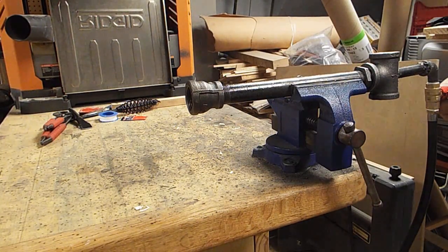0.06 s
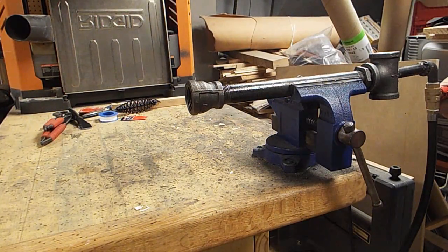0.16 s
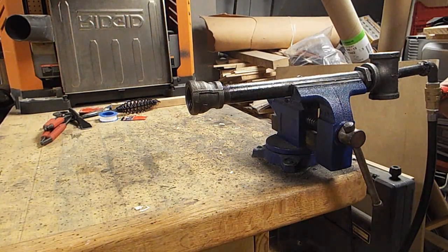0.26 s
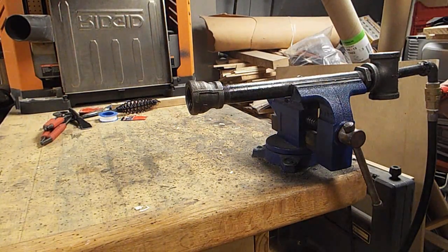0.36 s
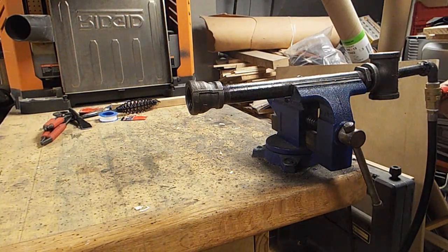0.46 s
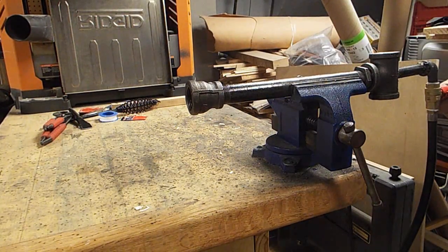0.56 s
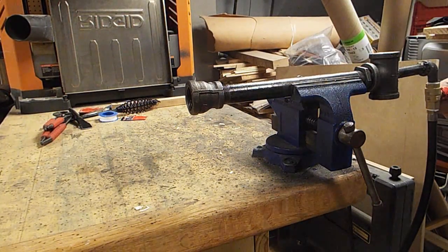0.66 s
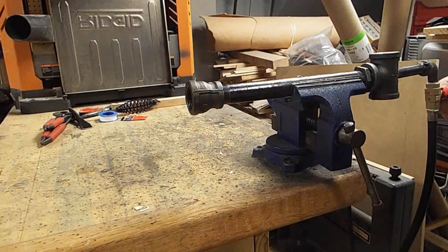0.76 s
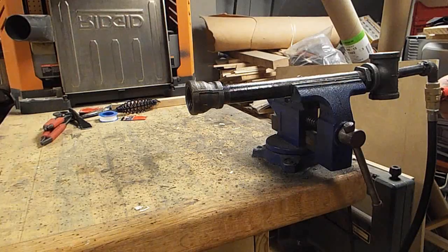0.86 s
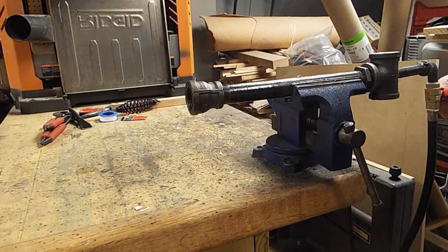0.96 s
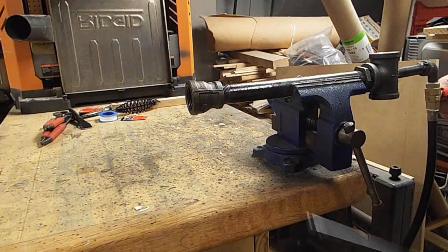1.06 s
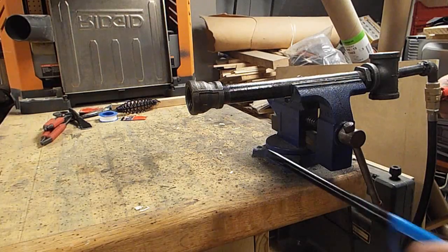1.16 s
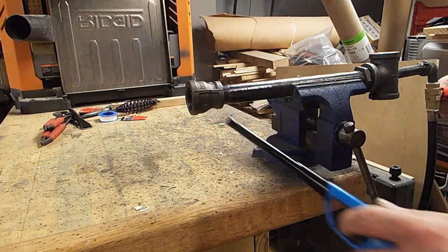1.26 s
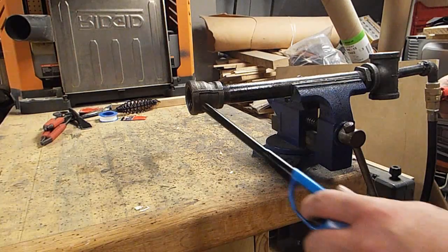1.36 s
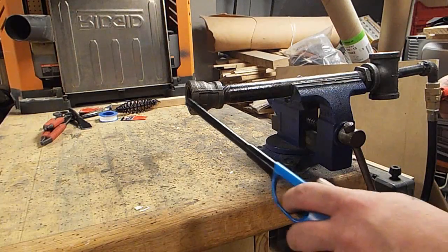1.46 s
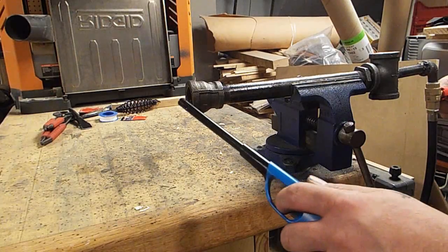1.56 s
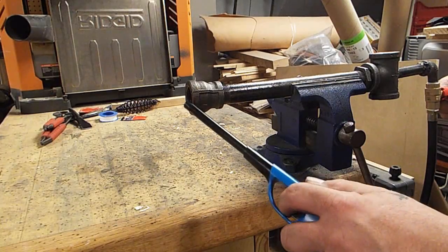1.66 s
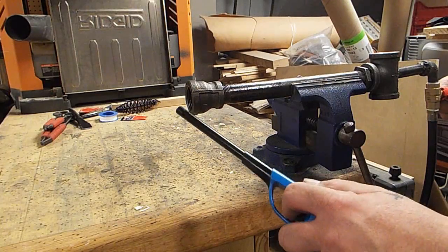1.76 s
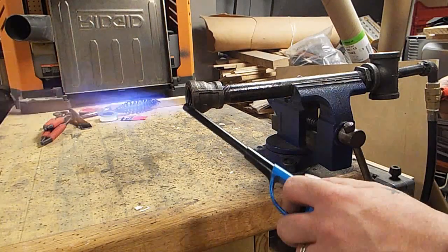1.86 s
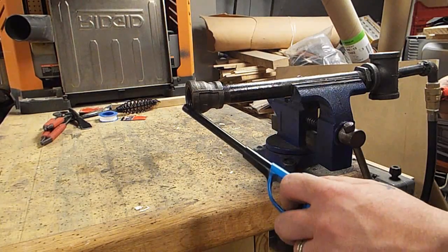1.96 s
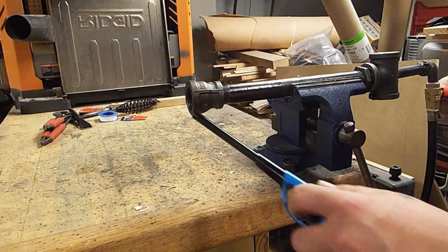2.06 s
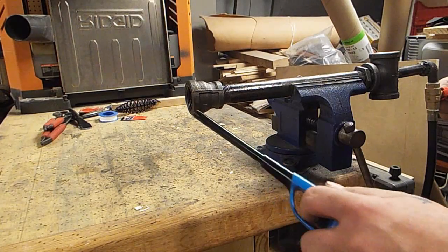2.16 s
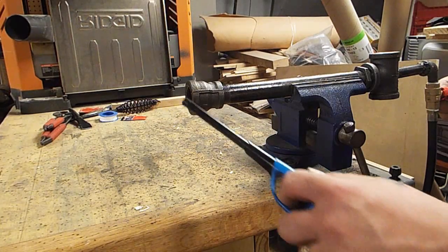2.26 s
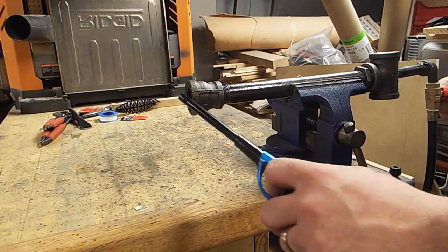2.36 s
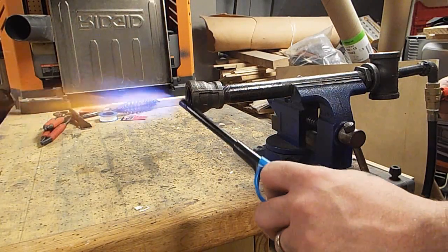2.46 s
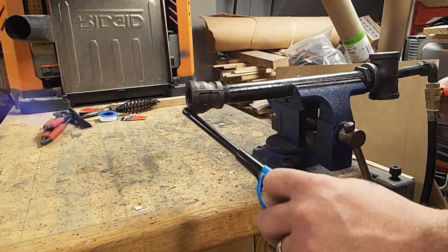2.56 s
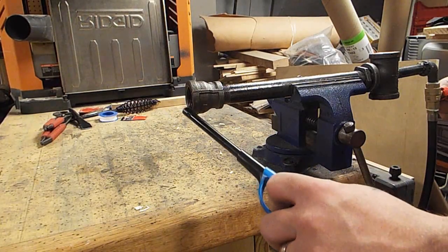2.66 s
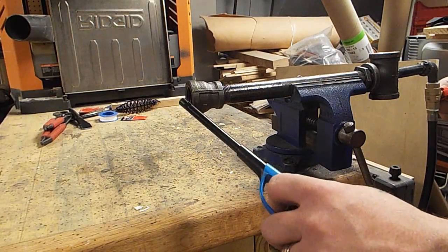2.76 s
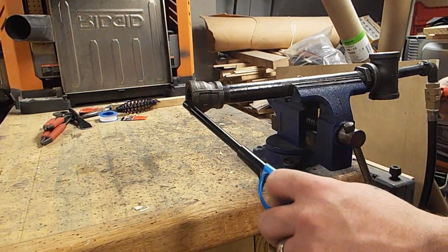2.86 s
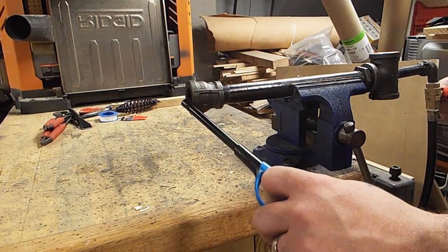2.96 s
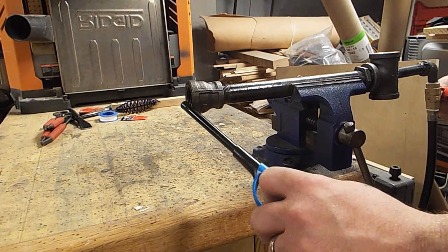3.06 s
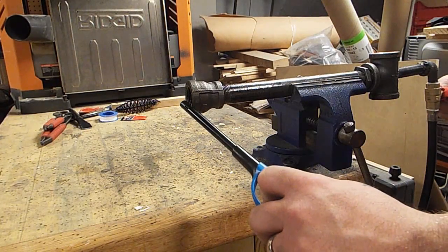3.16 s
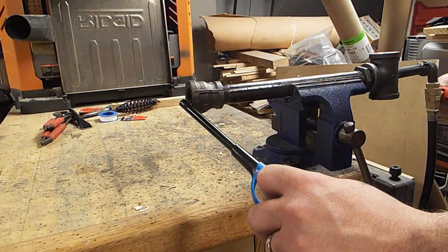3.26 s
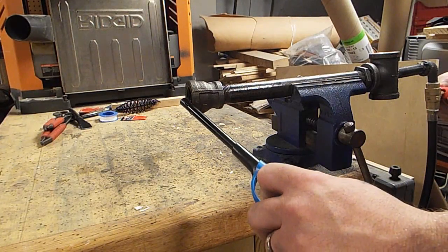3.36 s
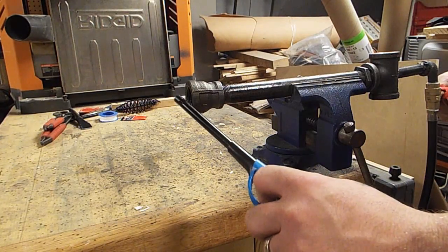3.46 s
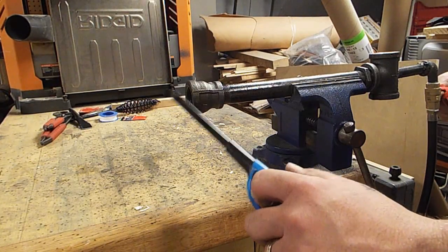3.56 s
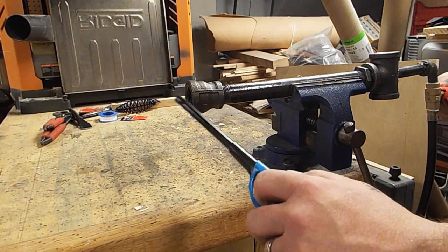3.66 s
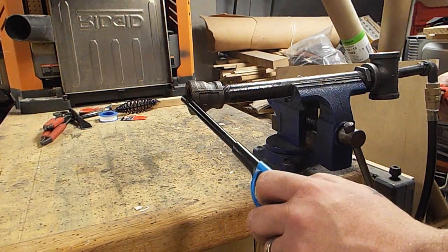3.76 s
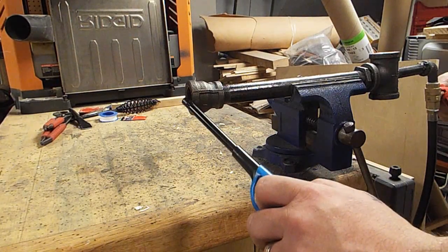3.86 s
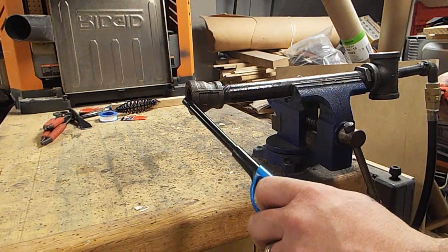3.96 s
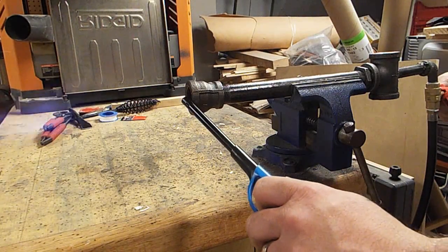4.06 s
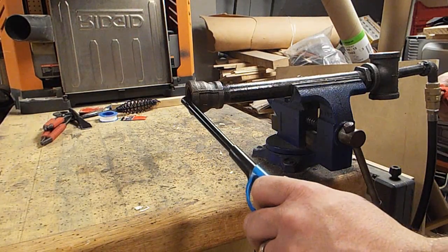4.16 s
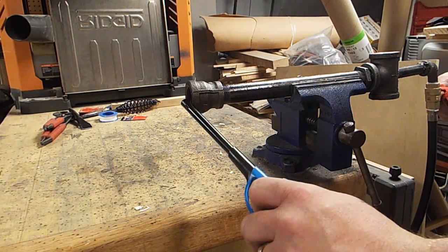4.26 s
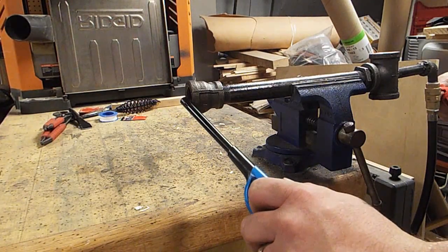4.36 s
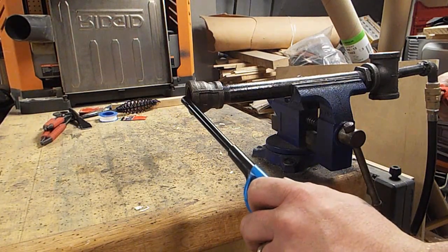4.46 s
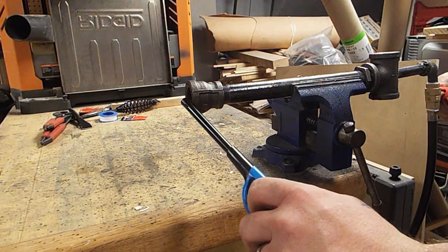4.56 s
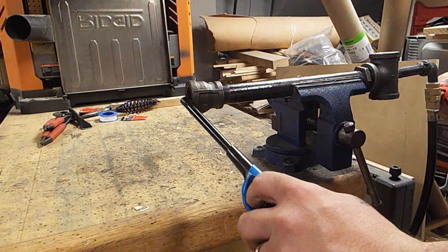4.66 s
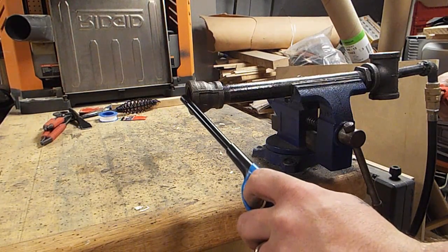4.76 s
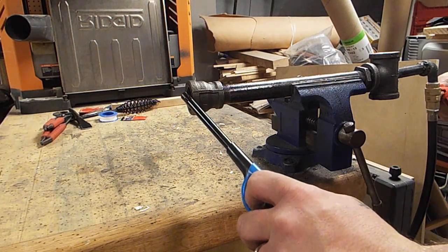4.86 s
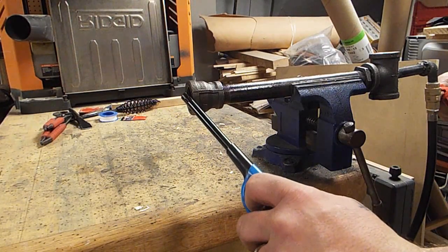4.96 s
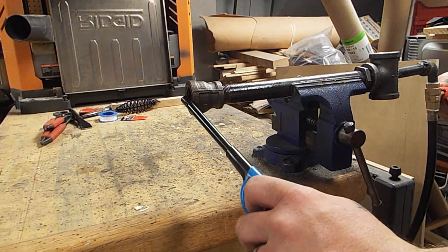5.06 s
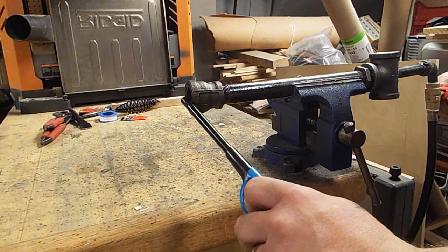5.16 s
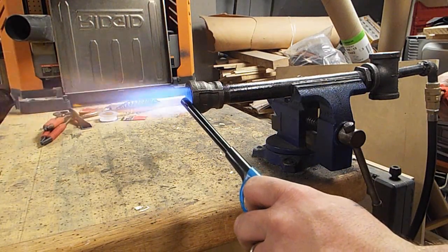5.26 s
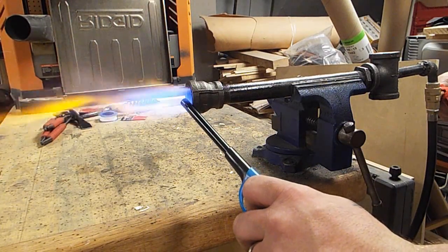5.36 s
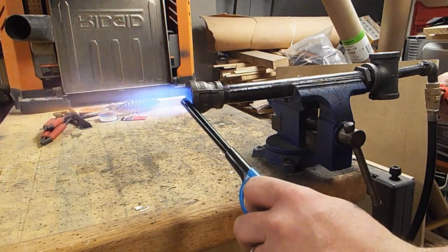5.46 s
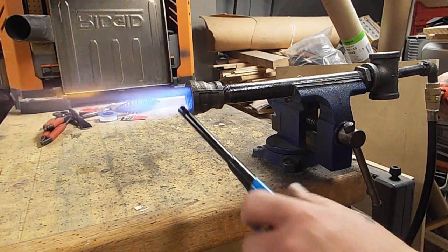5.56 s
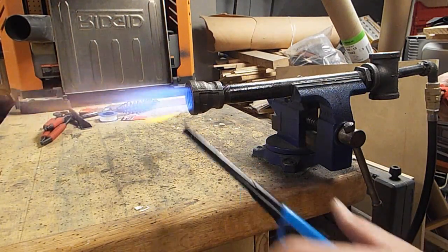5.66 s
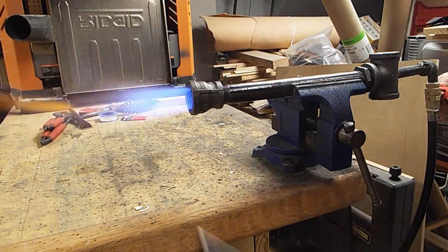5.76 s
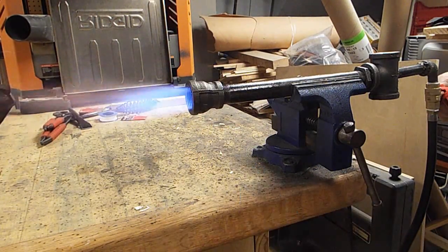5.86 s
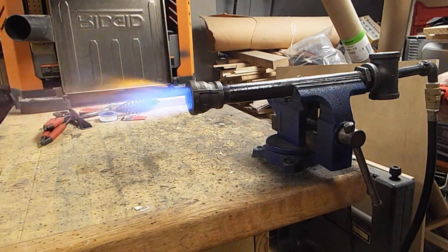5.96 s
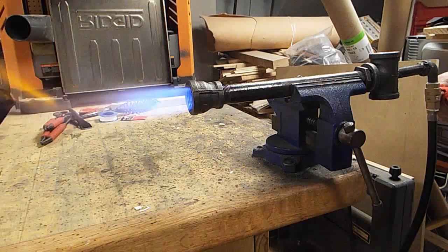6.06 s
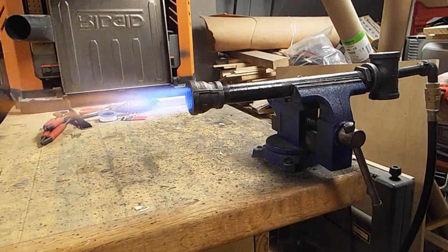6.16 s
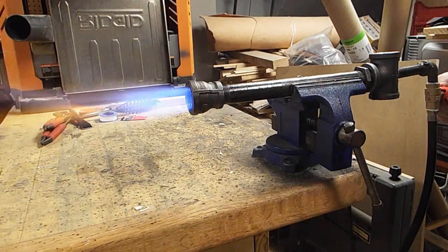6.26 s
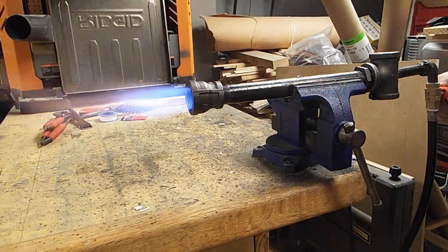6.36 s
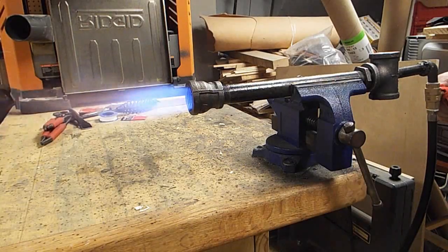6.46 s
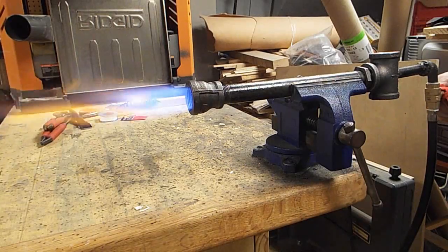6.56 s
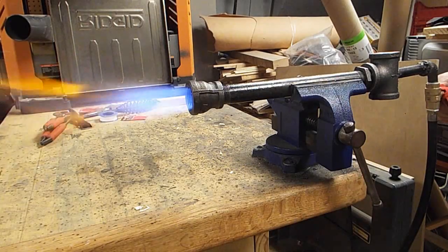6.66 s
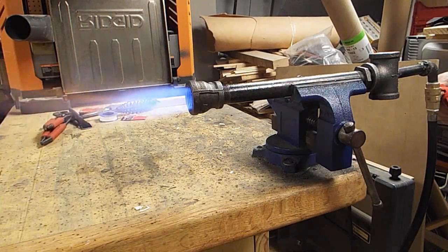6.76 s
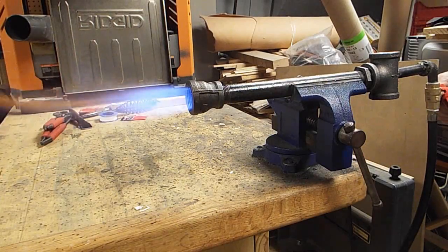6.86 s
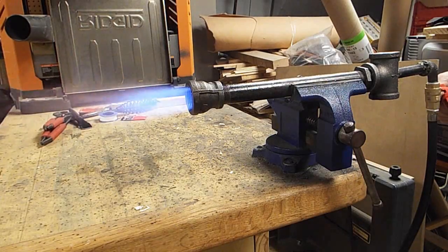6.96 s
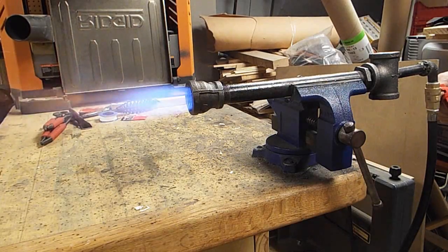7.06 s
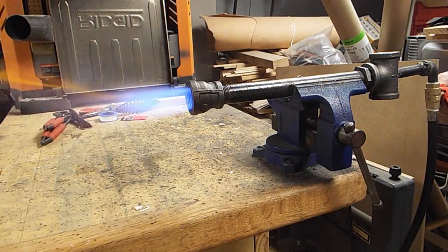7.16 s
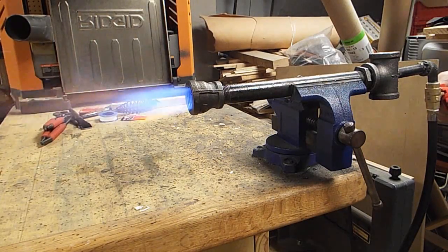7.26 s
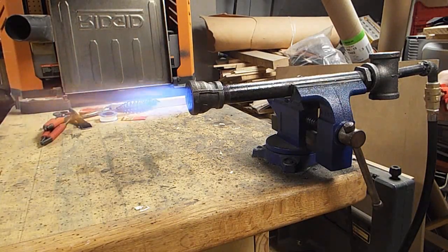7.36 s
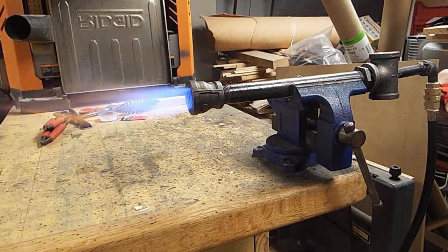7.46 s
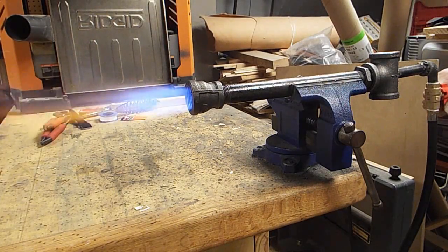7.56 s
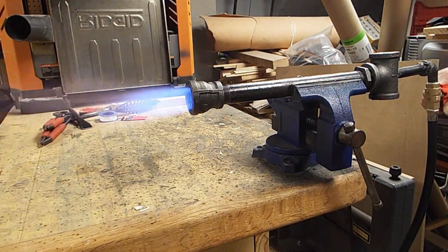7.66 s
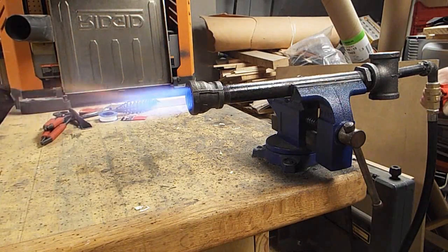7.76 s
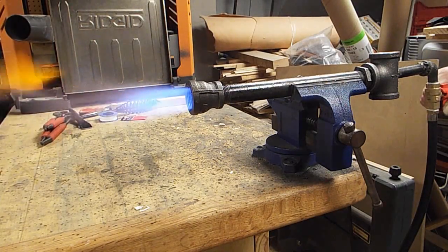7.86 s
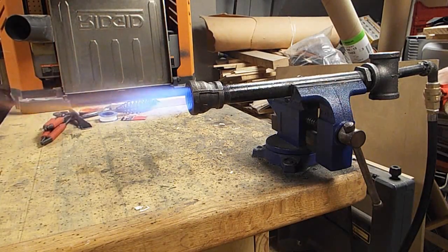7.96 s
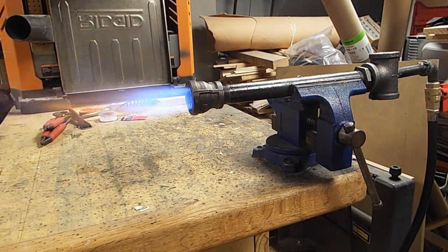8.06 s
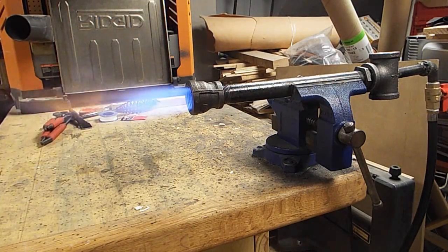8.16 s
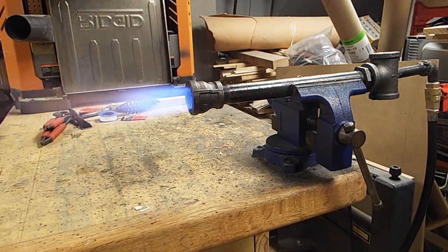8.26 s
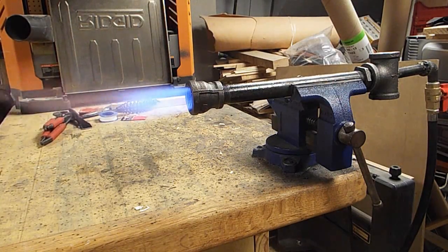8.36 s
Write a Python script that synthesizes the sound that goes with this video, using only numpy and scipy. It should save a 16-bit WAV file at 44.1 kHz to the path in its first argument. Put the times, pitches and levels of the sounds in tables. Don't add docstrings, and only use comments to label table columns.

```python
import sys
import numpy as np
from scipy import signal
from scipy.fft import rfft, irfft, next_fast_len
from scipy.io import wavfile
from scipy.ndimage import map_coordinates

SR = 44100
rng = np.random.default_rng(int(sys.argv[2]) if len(sys.argv) > 2 else 0)


def inscribe(sig):
    pcm = np.round(np.clip(np.atleast_2d(sig).T, -1, 1) * 32767)
    wavfile.write(sys.argv[1], SR, pcm.astype(np.int16))


def ratio(d):
    e = np.asarray(d, float) / 20
    return 10 ** e


N = 371410

# start_s, fed_s, roar_db, swell_db while fed, dying_db_per_s (0 stays lit)
BURNS = [
    (1.819, 0.068, -27, 5.5, 900),
    (2.429, 0.099, -18, -3.5, 322),
    (4.017, .024, -16, -3, 450),
    (5.179, 0.32, -17.5, -3, 0),
]
# pitch_hz, width_hz, level_db
ROAR_MODES = [(75, 19, -6), (116.6, 19, -10), (162.5, 22.3, 2), (209, 39, -12), (246.7, 20, -4),
              (328, 19.6, -6), (377, 35, -8), (437, 35, -16.5), (507.5, 26, -7.5), (551, 21.4, -8.5),
              (735, 60, -15), (927, 28, -19.5), (1012.5, 25, -13)]
# pitch_hz, level_db (per Hz)
RUSH_COLOUR = [(500, -21), (1000, -10.5), (1700, -5.5), (2600, -9.5), (6000, -8.5), (8000, -17.5),
               (11000, -22.5), (16000, -39.5)]
# pitch_hz, width_hz, level_db over the rush
BENCH_MODES = [(1125, 40, 9), (1204, 46, 6), (1290, 47, -4), (1400, 57, 4.5), (1533, 90, 4),
               (1714, 76, 4.5), (1905, 135, 5), (2130, 110, 5), (2334, 100, 4.5), (2554, 41, 5),
               (2760, 57, 5.5), (2920, 94, 5.5), (3252, 30, 7.5), (3400, 100, 5.5), (3860, 70, -3),
               (4720, 250, -1), (5200, 220, 0), (6130, 280, 0.5)]
# pitch_hz, width_hz, level_db
TUBE_MODES = [(550, 24, -1), (1098, 30, -5), (1552, 75, -5.5), (1900, 65, -7), (2230, 150, -5.5),
              (2690, 60, -5), (3240, 60, -8), (3430, 36, -11), (3760, 45, -5), (4180, 36, -2),
              (4750, 240, -7), (5180, 60, 0), (5570, 170, -6), (5770, 48, 0), (6290, 58, -2),
              (6440, 60, -5), (6720, 110, -10), (7410, 57, -10)]
# pitch_hz, level_db (per Hz)
HISS_COLOUR = [(300, -40), (800, -19), (1400, -10.5), (2300, -7), (3300, -3.5), (6000, -2), (11000, -4.5),
               (16000, -23.5)]
# start_s, peak_db, body_hz, other_modes_db
SNAPS = [
    (1.8, -5, 2430, -2.5),
    (2.4255, -6, 2400, -2.5),
    (4.0064, -7.5, 2450, -2),
    (5.1771, -8, 2500, -1),
]
# pitch_hz, width_hz, level_db
SHELL_MODES = [(1660, 540, 0), (3100, 890, 3), (4100, 900, 4), (5250, 800, 8), (6500, 900, 7),
               (8200, 1600, 5), (11500, 3000, -4)]
# start_s, peak_db, body_hz, upper_mode_db, contact_s
TICKS = [(1.4325, -24.5, 2600, -4, 0.0015), (1.433, -31, 1500, 3, .0016), (2.019, -33, 2500, 5, .002),
         (2.1035, -30, 2350, 7, .0012), (2.4105, -27, 2600, -5, .0012), (2.8684, -26.5, 2550, -2, .0016),
         (2.9585, -29, 2550, -1, .0012), (3.189, -37, 2600, -3, .0012), (3.3665, -33, 2600, -2, .0012),
         (3.558, -17.5, 2530, -8, 0.0028), (3.5592, -21.5, 3400, -11, .002), (3.56, -28, 1600, -5, .003),
         (3.7058, -16, 3040, -4, .0014), (3.8803, -25.5, 2680, -1, .0012), (4.4305, -26, 2680, -9, .0016),
         (4.648, -32, 2650, -5, .0012), (5.5503, -13.5, 2900, 7, .0014)]
# pitch_hz, width_hz, level_db
RATTLE_MODES = [(1600, 500, -13), (3500, 1300, -0.5), (5000, 1660, 1), (6400, 1200, -2), (10500, 3500, -14)]
# start_s, peak_db, dying_s (to fall 60 dB)
SCRAPES = [
    (1.684, -34, .03),
    (2.0185, -35.5, .04),
    (2.049, -30, .04),
    (2.06, -33, .03),
    (2.1035, -29, 0.011),
]
# start_s, peak_db
THUDS = [
    (1.4335, -31.5),
    (1.686, -52),
    (2.051, -48),
    (2.103, -52),
]
# strongest_s, level_db, spread_s
RUBS = [
    (.07, -73, .01),
    (.178, -68, 0.0091),
    (.27, -71, .06),
    (.41, -64, .065),
    (.71, -66, .015),
]
# pitch_hz, level_db (per Hz)
RUSTLE_COLOUR = [(350, -22), (620, -9), (860, -9), (1180, -10), (3500, -11), (5700, -7), (7200, -18),
                 (11700, -52)]
# pitch_hz, level_db
MAINS = [(59.2, -66), (118.4, -77), (183.0, -75)]
# pitch_hz, level_db (per Hz)
QUIET_COLOUR = [(12, -49), (20, 0), (65, -7.5), (170, -10), (410, -15), (499, -23), (5680, -31),
                (16000, -37.5)]
# pitch_hz, dying_s (to fall 60 dB)
SHOP_DECAY = [(100, 0.24), (500, 0.23), (2000, 0.15), (6000, 0.2), (14000, 0.16)]
# pitch_hz, side_over_mid_db
WIDTH = [(60, -21), (200, -30), (380, -25.5), (700, -39), (1290, -29), (2700, -19), (8120, -11.5),
         (15000, -5)]

VALVE_S, OPENING_DB_PER_S, JET_DB = 0.782, 235, -46.5
SURGE_DB, SURGE_S = 2.5, 0.13
CATCH_DB, CATCH_S = 22, 0.007
RUSH_DB, THIN_DB = -8.5, -0.5
FLASH_DB, FLASH_S = 16, 0.0082
BOOM_DB = -7.5
THUMP_DB, THUMP_S, SWING_DB = -13, 0.0028, -42.5
OVERTONE, OVERTONE_DB = 2.12, -8
UPPER_RATIO, RING_S = 1.61, 0.0037
RATTLE_DB = -4
ECHO_S, ECHO_DB = 0.0062, -7.5
SKIN_DB = -72
SPAN = SR // 3


def flame():
    *puffs, steady = [burning(*row) for row in BURNS]
    loose = sum(puffs)
    roar, rush = loose * ratio([[0], [THIN_DB]]) + steady * ratio([[0], [1.8]])
    flicker = wobble(25)

    def roar_colour(f):
        bass_cut = f ** 2 / (45 ** 2 + f ** 2)
        return np.sqrt(power(ROAR_MODES, f)) * bass_cut / np.sqrt(1 + (f / 1100) ** 4)

    def rush_colour(f):
        return coloured(RUSH_COLOUR)(f) * np.sqrt(1 + power(BENCH_MODES, f))

    low = noise(roar_colour)[0]
    high = noise(rush_colour)[0]
    boom = noise(lambda f: modes([(75, 70, 0)])(f) ** 2)[0]
    deep = ratio(BOOM_DB) * loose[0] * boom
    lumpy = roar * ratio(0.63 * flicker + 0.18 * wobble(8)) * low
    turbulent = rush * ratio(-1.5 + 0.14 * flicker + 0.9 * wobble(150)) * high
    return deep + lumpy, turbulent


def burning(s, fed, db, swell_db, dying):
    t, lit = since(s)
    catch_db = -CATCH_DB * np.exp(-t / CATCH_S)
    fed_db = swell_db * np.minimum(t / fed, 1)
    dying_db = -dying * np.maximum(t - fed, 0)
    roar = lit * ratio(db + catch_db + fed_db + dying_db)
    return np.array([roar, roar * ratio(RUSH_DB + FLASH_DB * np.exp(-t / FLASH_S))])


def heave():
    out, t = np.zeros(N + SR), np.arange(SR) / SR
    u = t / THUMP_S
    for s, *_ in BURNS:
        thump = ratio(THUMP_DB) * u ** 2 * (3 - u) * np.exp(-u) / 2
        swing = ratio(SWING_DB - 60 * t / 2.06) * np.sin(2 * np.pi * 11.9 * t)
        out[round(s * SR):][:SR] += thump + swing
    return out[:N]


def jet():
    t = np.arange(N) / SR - VALVE_S
    opening_db = OPENING_DB_PER_S * np.minimum(t, 0)
    surge_db = SURGE_DB * np.exp(-np.maximum(t, 0) / SURGE_S)
    flow = ratio(JET_DB + opening_db + surge_db + 0.66 * wobble(5.97) + 0.42 * wobble(40))
    tube = ratio(-1.5) * noise(modes(TUBE_MODES))[0]
    hiss = ratio(-5) * noise(coloured(HISS_COLOUR))[0]
    return flow * (tube + hiss)


def lighter():
    out = np.zeros((2, N + SR))
    for sound, table in [(snap, SNAPS), (tick, TICKS), (scrape, SCRAPES), (thud, THUDS)]:
        for s, db, *settings in table:
            out[:, round(s * SR):][:, :SPAN] += ratio(db) * sound(*settings)
    return out[:, :N]


def snap(hz, bright_db):
    t = np.arange(SPAN) / SR
    body = np.sin(2 * np.pi * hz * t) + ratio(OVERTONE_DB) * np.sin(2 * np.pi * OVERTONE * hz * t)
    ring = body * ratio(-60 * np.maximum(t - 0.0011, 0) / 0.0024)
    blow = filtered(burst(0.0015), lambda f: modes(SHELL_MODES)(f) * plastic(f))
    shell = ratio(bright_db + 1.5) * bounced(peaked(blow))
    direct = placed(filtered(ring, plastic), wet_db=-7.5, side_db=0.0, gap=0.004)
    return direct + placed(shell, wet_db=3.5, side_db=7, gap=0.004)


def tick(hz, high_db, contact):
    t = np.arange(SPAN) / SR
    held = np.minimum(0.5 + t / contact, 1) * ratio(-60 * np.maximum(t - contact, 0) / RING_S)
    upper = ratio(high_db) * np.sin(2 * np.pi * UPPER_RATIO * hz * t)
    ring = peaked(held * (np.sin(2 * np.pi * hz * t) + upper))
    rattle = peaked(filtered(burst(2.5 * contact), lambda f: modes(RATTLE_MODES)(f) * plastic(f)))
    direct = placed(bounced(ring), wet_db=-9, side_db=-3, gap=0.0045)
    return direct + placed(ratio(RATTLE_DB) * rattle, wet_db=6.5, side_db=7.5, gap=0.0045)


def scrape(t60):
    def colour(f):
        return modes([(1300, 900, -3), (4200, 3500, 0)])(f) * plastic(f) / (1 + 1j * f / 7000) ** 2

    return placed(peaked(filtered(burst(t60), colour)), wet_db=0.5, side_db=1)


def thud():
    t = np.arange(SPAN) / SR
    push = rng.standard_normal(SPAN) * t / 0.009 * np.exp(-t / 0.01)
    handle = modes([(250, 300, -8), (660, 170, 0), (1300, 600, -9)])
    knock = peaked(filtered(push, lambda f: handle(f) ** 2))
    return np.array([knock, np.zeros(SPAN)])


def plastic(f):
    return (1j * f / (900 + 1j * f)) ** 2 / (1 + 1j * f / 11000) ** 2


def burst(t60):
    blows = 0.48 * rng.standard_normal(SPAN) * ratio(-60 * np.arange(SPAN) / SR / max(t60, 1e-3))
    return blows + (np.arange(SPAN) == 0)


def bounced(x):
    return x + ratio(ECHO_DB) * np.roll(x, round(ECHO_S * SR))


def hand():
    t = np.arange(N) / SR
    rub = ratio(SKIN_DB) * (t < VALVE_S)
    for s, db, spread in RUBS:
        rub = rub + ratio(db - 3.5) * np.exp(-((t - s) / spread) ** 2)
    grain = ratio(2.1 * wobble(59.4))
    return rub * unit(grain * noise(coloured(RUSTLE_COLOUR))[0])


def background():
    t = np.arange(N) / SR
    hum = np.zeros(N)
    for hz, db in MAINS:
        hum += np.sqrt(2) * ratio(db + 0.5 * wobble(3.05)) * np.sin(2 * np.pi * hz * t)
    return hum * [[1.2], [0.8]] + ratio(-60.5) * noise(coloured(QUIET_COLOUR), channels=2)


def tail(gap):
    hz, t, z = signal.stft(rng.standard_normal((2, SR // 2)), SR, nperseg=256)
    fade = ratio(-60 * t / along(SHOP_DECAY, hz)[:, None])
    r = signal.istft(z * fade, SR, nperseg=256)[1]
    return np.pad(r / np.linalg.norm(r[0]), ((0, 0), (round(gap * SR), 0)))


def placed(x, wet_db, side_db, gap=0.0035):
    wet = signal.fftconvolve(x[None], tail(gap), axes=1)[:, :len(x)]
    return np.array([x + ratio(wet_db) * wet[0], ratio(side_db) * wet[1]])


def unit(x):
    return x / np.sqrt(np.mean(x ** 2) + 1e-20)


def peaked(x):
    return x / np.abs(x).max()


def since(s):
    t = np.arange(N) / SR - s
    return np.maximum(t, 0), t >= 0


def along(points, hz):
    f, v = np.transpose(points)
    return np.interp(np.log(hz + 1), np.log(f + 1), v)


def wobble(rate):
    knots = rng.standard_normal(int(N * rate / SR) + 4)
    return map_coordinates(knots, [np.arange(N) * rate / SR])


def filtered(x, response):
    m = next_fast_len(x.shape[-1] + 8192)
    return irfft(rfft(x, m) * response(np.fft.rfftfreq(m, 1 / SR)), m)[..., :x.shape[-1]]


def modes(table):
    def response(f):
        total = 0
        for k, (c, w, db) in enumerate(table):
            total = total + (-1) ** k * ratio(db) * 1j * f * w / (c * c - f * f + 1j * f * w)
        return total

    return response


def power(table, f):
    return sum(np.abs(modes([mode])(f)) ** 2 for mode in table)


def coloured(spectrum):
    return lambda hz: ratio(along(spectrum, hz))


def noise(response, channels=1):
    return unit(filtered(rng.standard_normal((channels, N)), response))


def scene():
    low, rush = flame()
    near = placed(low, wet_db=-13.5, side_db=-4) + placed(rush, wet_db=-5.5, side_db=0.0)
    near = near + placed(jet(), wet_db=-6.0, side_db=3) + lighter()
    near = near + placed(hand(), wet_db=0.5, side_db=8)
    side = filtered(near[1], coloured(WIDTH))
    mid = near[0] + heave()
    balance = ratio([[0.3], [-0.3]])
    return np.array([mid + side, mid - side]) * balance + background()


def band_limit(x):
    return signal.sosfilt(signal.butter(12, 16510, fs=SR, output="sos"), x)


def record(dry):
    top, knee = 0.54, 5
    soft = dry / (1 + np.abs(dry / top) ** knee) ** (1 / knee)
    mix = filtered(soft, lambda hz: hz < 15950)
    return band_limit(mix)


dry = scene()
out = record(dry)
inscribe(out)
```